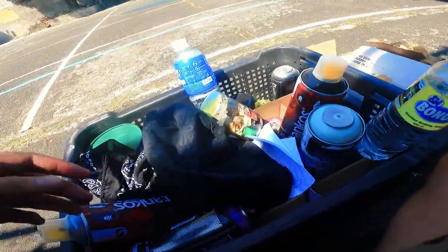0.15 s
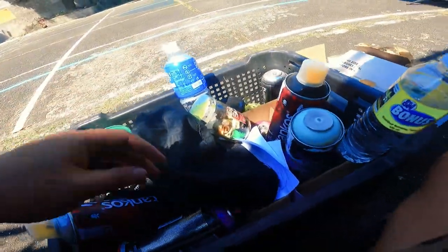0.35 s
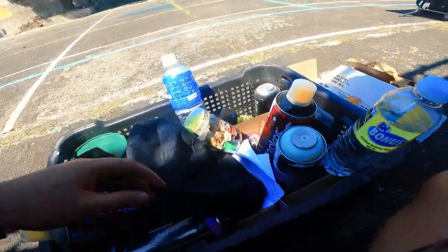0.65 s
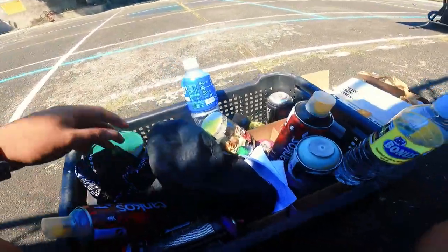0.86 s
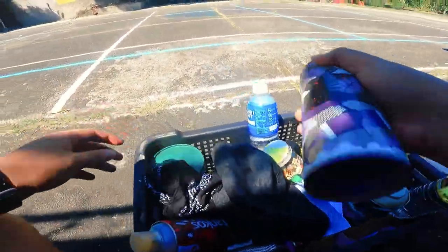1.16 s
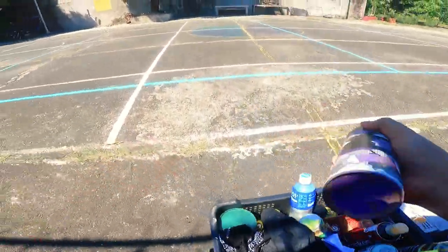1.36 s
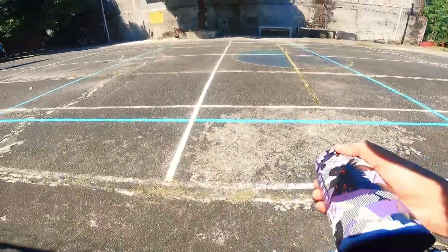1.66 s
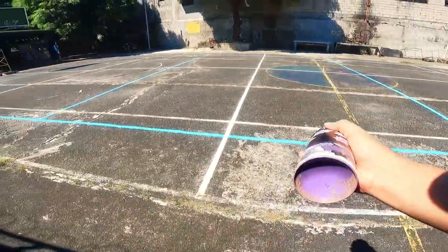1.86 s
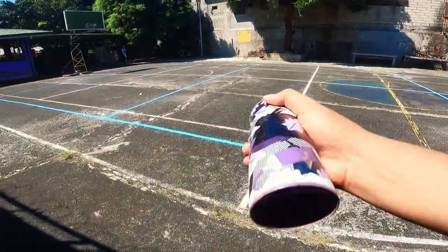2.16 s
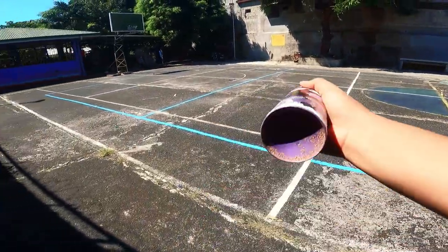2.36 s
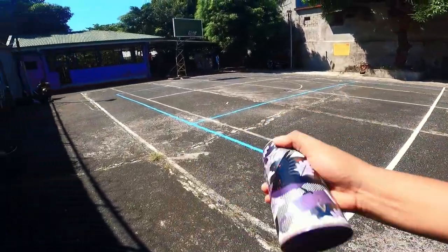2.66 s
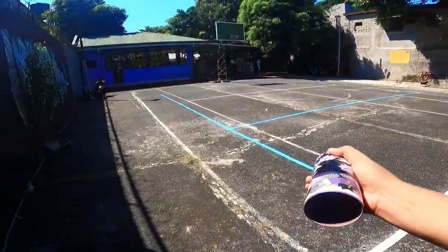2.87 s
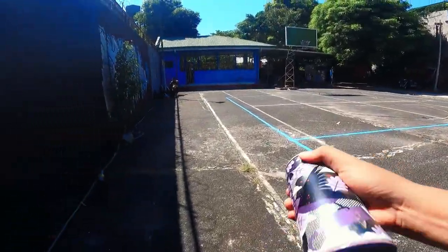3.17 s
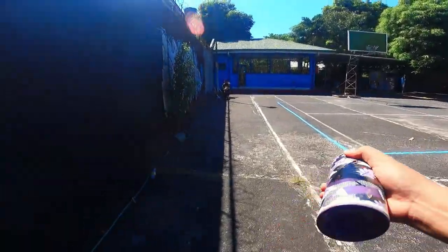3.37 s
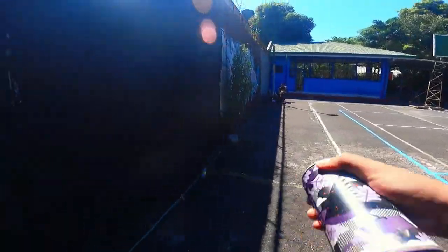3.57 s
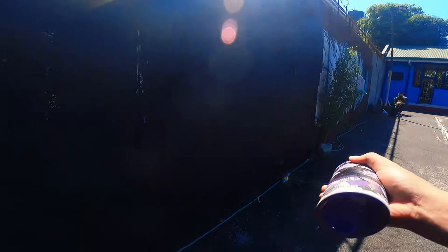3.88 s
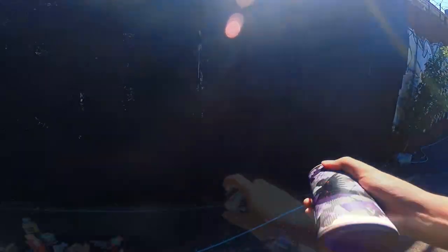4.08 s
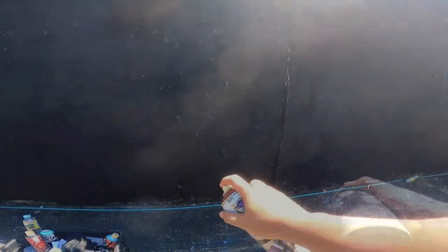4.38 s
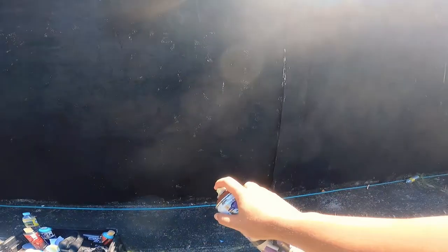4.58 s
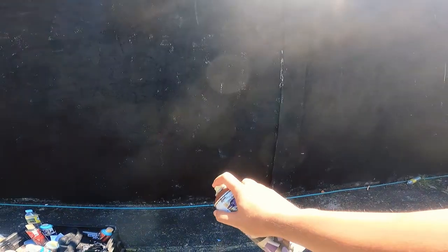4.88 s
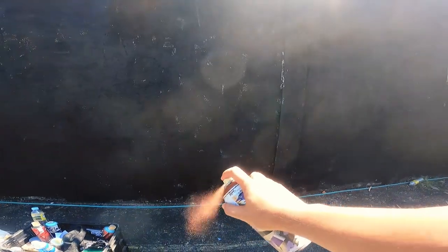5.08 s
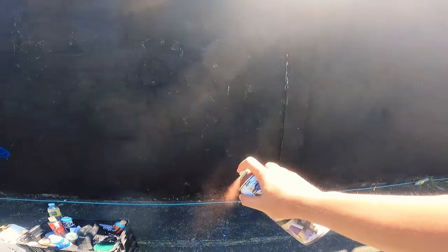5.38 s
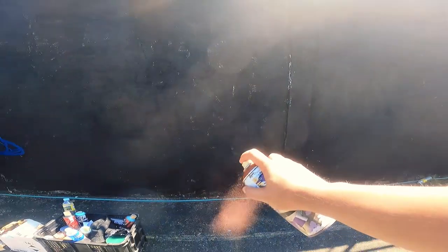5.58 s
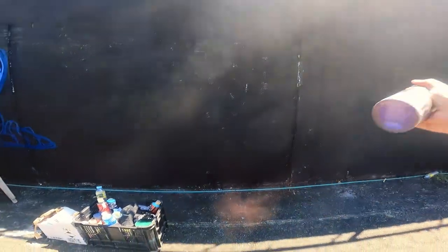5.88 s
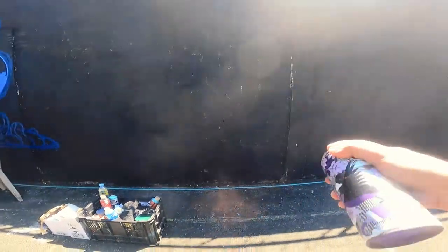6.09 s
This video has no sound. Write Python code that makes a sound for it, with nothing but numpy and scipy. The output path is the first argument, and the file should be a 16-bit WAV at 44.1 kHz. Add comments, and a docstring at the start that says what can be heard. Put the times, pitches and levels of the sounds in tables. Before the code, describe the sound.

Rapid metallic ball rattle inside a shaken paint can, dying away to quiet open air, short soft spray hisses, then the rattle restarts.

```python
"""A spray can is shaken hard on an open court: its mixing ball bangs and bounces on the paint-damped wall
and domed ends. Each contact rings decaying sines, with a faint smear and bands of noise around it.
The shaking stops, the nozzle gives three short puffs of hissing noise, the rattle starts again.
Wind rumbles on the microphone and far traffic hisses, both as coloured noise.
A low hum, a sine of unsteady pitch, wavers early on."""
import sys
import numpy as np
from scipy import signal
from scipy.fft import rfft, irfft, next_fast_len
from scipy.io import wavfile
from scipy.ndimage import uniform_filter1d, map_coordinates

SR = 44100
rng = np.random.default_rng(int(sys.argv[2]) if len(sys.argv) > 2 else 0)


def amp(db):
    return 10 ** (np.asarray(db, float) / 20)


def write(x):
    x = np.atleast_2d(x).T
    wavfile.write(sys.argv[1], SR, np.round(np.clip(x, -1, 1) * 32767).astype(np.int16))


N = 275184  # length in samples

# ball contacts: [t/s, strength/dB, landing spot from 0 mid-wall to 1 far end, pitch that rings out f/Hz]
CONTACTS = [(0.0068, -19.5, 0.38, 1620), (0.046, -28.5, 0.2, 1500), (0.07, -17.5, 0.45, 4040),
            (0.0735, -12.5, 0.8, 5070), (0.113, -25.5, 0.57, 4630), (0.1418, -27, 0.56, 4530),
            (0.172, -23.5, 0.58, 4600), (0.1873, -29.5, 0.4, 1680), (0.1965, -22, 0.4, 1870),
            (0.217, -29, 0.22, 1470), (0.244, -18, 0.42, 1090), (0.2514, -22.5, 0.31, 1210),
            (0.2838, -23, 0.16, 1250), (0.29, -22, 0.36, 1390), (0.3182, -11.5, 0.61, 4940),
            (0.337, -16, 0.57, 4630), (0.3508, -21.5, 0.31, 1300), (0.3678, -16, 0.71, 4780),
            (0.406, -27, 0.4, 1310), (0.421, -18, 0.36, 1310), (0.4661, -17, 0.32, 1380),
            (0.483, -21, 0.18, 1670), (0.5074, -27, 0.11, 1470), (0.547, -10.5, 0.57, 4540),
            (0.575, -25, 0.37, 1300), (0.596, -12.5, 0.5, 4080), (0.627, -14, 0.49, 4450),
            (0.6469, -25, 0.42, 1400), (0.675, -14, 0.46, 1270), (0.6915, -16.5, 0.38, 1250),
            (0.7723, -5.5, 0.55, 4190), (0.8197, -21, 0.5, 4460), (0.8558, -18, 0.62, 3050),
            (0.8683, -19, 0.45, 1620), (0.8775, -17.5, 0.46, 1450), (0.8932, -21, 0.41, 1390),
            (0.939, -15.5, 0.44, 804), (0.9888, -21, 0.44, 1500), (1.0117, -10, 0.62, 4080),
            (1.023, -11, 0.59, 3980), (1.046, -11.5, 0.66, 4380), (1.0865, -19, 0.41, 1156),
            (1.1045, -12, 0.36, 1660), (1.1291, -12, 0.3, 1680), (1.1434, -13, 0.5, 1000),
            (1.1812, -12, 0.39, 1070), (1.1922, -15, 0.12, 1740), (1.2411, -16.5, 0.4, 970),
            (1.2495, -11, 0.56, 4920), (1.2793, -8.5, 0.58, 4450), (1.343, -20, 0.31, 1790),
            (1.361, -17.5, 0.46, 1820), (1.3776, -13.5, 0.44, 1790), (1.4089, -19.5, 0.39, 1680),
            (1.4412, -9.5, 0.5, 1620), (1.4987, -21.5, 0.35, 990), (1.5331, -8.5, 0.6, 3030),
            (1.5518, -32, 0.28, 2730), (1.594, -15.5, 0.7, 2970), (1.6183, -16, 0.26, 1250),
            (1.6339, -11.5, 0.43, 1660), (1.652, -27, 0.64, 1190), (1.666, -13, 0.47, 1080),
            (1.684, -15.5, 0.38, 2950), (1.737, -25.5, 0.31, 3100), (1.7631, -11.5, 0.57, 2950),
            (1.7695, -14.5, 0.71, 2870), (1.816, -31, 0.4, 1300), (1.8235, -28.5, 0.76, 3400),
            (1.838, -23, 0.42, 2880), (1.8708, -13, 0.5, 1270), (1.892, -18.5, 0.39, 1600),
            (1.914, -11.5, 0.49, 1107), (1.9476, -12, 0.5, 6900), (1.9854, -23, 0.22, 1250),
            (2.0206, -9, 0.69, 2790), (2.031, -14.5, 0.73, 2940), (2.074, -32, 0.75, 3300),
            (2.09, -29, 0.47, 2500), (2.1135, -19.5, 0.46, 1630), (2.1265, -24, 0.43, 1610),
            (2.1357, -21, 0.38, 1640), (2.1738, -11.5, 0.48, 2510), (2.184, -15.5, 0.47, 2065),
            (2.1985, -22.5, 0.43, 1600), (2.254, -22.5, 0.35, 1570), (2.2668, -12.5, 0.61, 2920),
            (2.271, -11, 0.7, 4330), (2.2974, -17, 0.72, 2750), (2.3235, -19, 0.7, 2870),
            (2.348, -15.5, 0.75, 3520), (2.3674, -15.5, 0.47, 1730), (2.3905, -20, 0.34, 1670),
            (2.4358, -10.5, 0.41, 1680), (2.447, -16.5, 0.46, 1610), (2.4755, -29, 0.2, 1590),
            (2.528, -8, 0.78, 2700), (2.5352, -16, 0.73, 4440), (2.585, -29, 0.93, 2940),
            (2.6184, -17, 0.92, 3520), (2.6279, -17, 0.41, 1700), (2.6352, -33, 0.3, 1640),
            (2.6487, -19, 0.24, 1530), (2.6653, -32, 0.34, 1500), (2.6809, -13.5, 0.53, 1015),
            (2.6941, -15.5, 0.51, 1020), (2.774, -11.5, 0.47, 2940), (2.7884, -10, 0.64, 3000),
            (2.8064, -18, 0.57, 2780), (2.8481, -13, 0.68, 5600), (2.875, -15.5, 0.49, 1750),
            (2.8927, -21.5, 0.36, 1550), (2.9241, -13, 0.41, 2970), (2.9357, -20, 0.51, 1960),
            (2.9505, -14, 0.43, 1390), (3.0384, -19.5, 0.31, 940), (3.0474, -11, 0.63, 3080),
            (3.0651, -13, 0.66, 2970), (3.0776, -26, 0.3, 1230), (3.102, -16, 0.64, 3100),
            (3.1208, -21, 0.5, 1534), (3.1377, -12.5, 0.45, 1350), (3.1582, -26, 0.39, 1300),
            (3.175, -23, 0.46, 975), (3.189, -13, 0.45, 1000), (3.2013, -12.5, 0.32, 3190),
            (3.2627, -16, 0.5, 1140), (3.278, -7.5, 0.59, 4190), (3.3113, -23, 0.46, 1290),
            (3.3219, -21, 0.62, 2940), (3.3755, -12.5, 0.32, 1600), (3.3944, -19.5, 0.33, 1600),
            (3.4122, -15, 0.29, 1580), (3.448, -13.5, 0.53, 1565), (3.455, -17.5, 0.18, 1470),
            (3.4609, -12.5, 0.39, 2140), (3.4717, -19.5, 0.5, 1570), (3.4988, -22, 0.36, 1410),
            (3.5323, -9.5, 0.43, 2910), (3.5376, -9, 0.76, 4110), (3.5532, -13.5, 0.64, 3970),
            (3.591, -23.5, 0.5, 1570), (3.625, -15, 0.44, 1690), (3.6433, -17.5, 0.15, 1690),
            (3.653, -15, 0.25, 1660), (3.6719, -11.5, 0.35, 2920), (3.7023, -9, 0.37, 2470),
            (3.7382, -15.5, 0.55, 1400), (3.762, -21, 0.2, 3100), (3.7864, -10, 0.55, 3030),
            (3.7938, -13.5, 0.63, 4100), (3.8204, -17.5, 0.61, 3140), (3.859, -14.5, 0.63, 4430),
            (3.8854, -12, 0.54, 1760), (3.895, -16.5, 0.56, 1780), (3.9236, -17.5, 0.28, 1700),
            (3.9649, -7.5, 0.42, 2990), (4.0308, -22, 0.33, 3320), (4.0444, -20, 0.61, 3360),
            (4.052, -9.5, 0.69, 3240), (4.0667, -17.5, 0.55, 3430), (4.0867, -36, 0.6, 3220),
            (4.118, -33, 0.26, 3250), (4.1287, -34, 0.37, 3500), (4.151, -22, 0.45, 1540),
            (4.1698, -24.5, 0.47, 1650), (4.197, -20, 0.54, 1017), (4.209, -21.5, 0.45, 2840),
            (4.2695, -38.5, 0.41, 1200), (4.3127, -23.5, 0.62, 4770), (4.3196, -23.5, 0.53, 3280),
            (4.331, -32, 0.99, 2890), (4.3703, -36, 0.4, 1510), (4.3807, -39, 0.25, 1600),
            (4.39, -38.5, 0.67, 3630), (4.4045, -37, 0.22, 1570), (4.416, -41, 0.25, 1600),
            (4.451, -36.5, 0.42, 1020), (5.1416, -34, 0.34, 1520), (5.275, -27, 0.78, 6300),
            (6.0753, -28.5, 0.14, 920), (6.124, -12, 0.47, 3960), (6.133, -12, 0.67, 2850),
            (6.153, -16.5, 0.44, 4100), (6.1608, -20, 0.62, 4240), (6.1832, -23, 0.39, 980),
            (6.2264, -11.5, 0.59, 4800), (6.228, -9.5, 0.49, 2750)]
# what the can rings with, before each contact varies it: [f/Hz, level/dB, time to fall by 60 dB t/s]
CAN_MODES = [(330, -10.5, 0.0075), (1036, 4.5, 0.0035), (1644, 0.5, 0.0065), (2540, 3.5, 0.0064),
             (3094, 6, 0.0052), (4010, 5, 0.0029), (5160, -1.5, 0.0061), (6226, -3.5, 0.0049),
             (8000, -6.5, 0.002), (13000, -28, 0.0034), (14800, -44, 0.002)]
# borders between wall, dome, tick and crack modes: [f/Hz]
PART_BORDERS = [2000, 3500, 10000]
# how the grip lets the dome ring against the bright tick: [t/s, dome over tick level/dB]
GRIP_BALANCE = [(0, -7.5), (.6, -1), (1.35, -3), (1.6, -0.5), (2.3, 2.5), (2.6, -3), (4.1, 0.5), (5, -18),
                (6.2, -3)]
# how openly the can's crack reaches the microphone: [t/s, level/dB]
CRACK_OPENNESS = [(0, -6), (1.6, 7), (4.1, 0), (6.1, 9)]
# thick unmixed paint drags the ball at first, trading ring for rustle: [t/s, level/dB]
PAINT_WASH = [(1.3, 2.5), (1.45, -0.5)]
# the ball rolls along the wall: [start t/s, end t/s, level/dB]
BALL_ROLLS = [(6.095, 6.26, -21.5)]
# nozzle puffs: [valve starts to open t/s, starts to close t/s, level/dB]
NOZZLE_PUFFS = [(5.055, 5.232, -43), (5.497, 5.657, -45.5), (5.775, 6, -56)]
# colour of the nozzle hiss: [f/Hz, relative level per Hz/dB]
HISS_COLOUR = [(900, -22), (2000, -16), (7800, -20.5), (10900, -22.5), (12600, -19), (15700, -31)]
# wind rumble: [t/s, level/dB]
WIND_LEVEL = [(0.0, -21.5), (0.12, -24.5), (0.2, -34.5), (0.42, -39.5), (1.68, -36.5), (1.88, -47),
              (4.03, -42.5), (4.33, -58), (4.74, -36.5), (6.24, -40.5)]
# colour of the wind rumble: [f/Hz, relative level per Hz/dB]
WIND_COLOUR = [(15, -39), (25, 6.5), (50, 2), (141, -0.5), (257, -9.5), (500, -30), (1100, -120)]
# far traffic: [t/s, level/dB]
TRAFFIC_LEVEL = [(0, -47.5), (4.1, -51.5), (4.4, -53.5), (4.75, -42), (5.3, -44.5), (6.2, -47.5)]
# colour of the far traffic: [f/Hz, relative level per Hz/dB]
TRAFFIC_COLOUR = [(150, -6), (535, -10.5), (975, -16.5), (1260, -21), (3000, -22), (5250, -30.5),
                  (12000, -42), (15600, -86), (22000, -120)]
# low hum, before it wavers: [t/s, f/Hz, level/dB]
HUM_TRACK = [(.2, 130.6, -43), (.85, 148.7, -44), (1.6, 148.6, -51.5), (2.6, 152.7, -57.5)]
# the sound starts on the right and folds to the centre: [t/s, left minus right level/dB]
SIDE_LEAN = [(0, -5.5), (.3, -5), (.45, -.8), (.8, 0)]
# colour of the left-right difference: [f/Hz, relative level per Hz/dB]
SIDE_COLOUR = [(3500, -30), (4500, -19.5), (10500, -24.5), (15500, -43)]
# microphone colour: [f/Hz, level/dB]
MIC_COLOUR = [(8300, 0), (10900, -11), (12500, -9)]

SPOT_DB, SCATTER_DB = 50, 2  # ends over wall gained from spot 0 to 1; chance in the dome-tick balance
WALL_DB, DOME_DB, TICK_DB = 3, 2, 6  # each part's ring over its share of the strength
FAVOUR_DB, OTHERS_DB = 4.5, -2.5  # gain of the mode nearest a contact's pitch, and of the rest
LINGER = 1.366  # times longer that the nearest mode rings, on wall and dome
SOFT_DB_PER_DB = 0.3  # how fast the other modes drop out as contacts get lighter


def unit(x):
    """Scales a sound to an average (rms) level of 1."""
    return x / np.sqrt(np.mean(x ** 2) + 1e-20)


def curves(rows):
    """Draws straight lines between the rows: one value per sample for each column after the time."""
    s, *cols = np.transpose(rows)
    return [np.interp(np.arange(N) / SR, s, c) for c in cols]


def wobble(rate):
    """A smooth random curve through rate random points a second."""
    knots = rng.standard_normal(int(N * rate / SR) + 4)
    return map_coordinates(knots, [np.arange(N) * rate / SR])


def noise(spectrum):
    """Noise of rms 1, coloured by joining (Hz, dB) points on a logarithmic pitch scale."""
    m = next_fast_len(N)
    f, db = np.transpose(spectrum)
    gain = amp(np.interp(np.log(np.fft.rfftfreq(m, 1 / SR) + 1), np.log(f + 1), db))
    return unit(irfft(rfft(rng.standard_normal(m)) * gain, m)[:N])


def wind():
    """Wind on the microphone: low noise whose level rises and falls in gusts."""
    level_db, = curves(WIND_LEVEL)
    return amp(level_db) * unit(amp(2.1 * wobble(6)) * noise(WIND_COLOUR))


def traffic():
    """Far traffic: noise that grows weaker towards the treble, at a drifting level."""
    level_db, = curves(TRAFFIC_LEVEL)
    return amp(level_db + 1.75 * wobble(7)) * noise(TRAFFIC_COLOUR)


def hum():
    """A low sine whose pitch and level both waver."""
    hz, level_db = curves(HUM_TRACK)
    turns = np.cumsum(hz + 2.17 * wobble(12)) / SR
    return amp(level_db + 2.8 * wobble(8.2)) * np.sqrt(2) * np.sin(2 * np.pi * turns)


def share_db(over_db):
    """Share of the energy, in dB, taken by a part that lies over_db above its rival."""
    return -10 * np.log10(1 + amp(-over_db) ** 2)


def contacts():
    """Splits each contact among wall, dome and tick by where the ball lands and how the can is held."""
    s, strength_db, spot, hz = np.transpose(CONTACTS)
    ends_db = SPOT_DB * (spot - .5)
    dome_over_tick_db = np.interp(s, *np.transpose(GRIP_BALANCE)) + SCATTER_DB * rng.standard_normal(len(s))
    ends = strength_db + share_db(ends_db)
    wall = strength_db + share_db(-ends_db) + WALL_DB
    dome = ends + share_db(dome_over_tick_db) + DOME_DB
    tick = ends + share_db(-dome_over_tick_db) + TICK_DB
    return np.column_stack([s, wall, dome, tick, hz])


def wash_db(blows):
    """How much the paint smears each contact, in dB."""
    return np.interp(blows[:, 0], *np.transpose(PAINT_WASH))


def parts(blows):
    """Levels of wall, dome, tick and crack; the crack follows wall and tick and grows faster with force."""
    force_db = np.maximum(blows[:, 1], blows[:, 3] - 4)
    open_db = np.interp(blows[:, 0], *np.transpose(CRACK_OPENNESS))
    crack_db = force_db + 0.48 * (force_db + 15) + open_db
    return np.column_stack([blows[:, 1:-1], crack_db])


def ring(blows, lead_db):
    """Each blow rings the can's modes inside a faint smear; chance varies pitch and strength every time."""
    hz, db, t60 = np.transpose(CAN_MODES)
    part = np.searchsorted(PART_BORDERS, hz)  # 0 wall, 1 dome, 2 tick, 3 crack
    lead = SR // 30
    t = np.arange(-lead, lead) / SR
    draw = rng.standard_normal((len(blows), 5, len(CAN_MODES)))
    level_draw, pitch_draw, phase, beat_draw, smear_draw = np.moveaxis(draw, 1, 0)
    level_db = parts(blows)[:, part] + db - wash_db(blows)[:, None] / 2
    pitch = hz * (1 + (.02 + .05 * (part >= 2)) * pitch_draw)
    soft_db = SOFT_DB_PER_DB * np.clip(-14 - blows[:, 1:-1].max(1, keepdims=True), 0, None)

    # the mode nearest a contact's own pitch takes that pitch and is favoured
    apart = np.abs(np.log(hz / blows[:, -1:]))
    near = apart == apart.min(1, keepdims=True)
    pitch = np.where(near, blows[:, -1:], pitch)
    level_db = level_db + np.where(near, FAVOUR_DB, OTHERS_DB - soft_db)

    # chance shifts energy between the modes but keeps the total
    mixed_db = level_db + np.where(near, 0, 2.7 * level_draw)
    energy = (amp(level_db) ** 2).sum(1)
    mixed_energy = (amp(mixed_db) ** 2).sum(1)
    level_db = mixed_db + 10 * np.log10(energy / mixed_energy)[:, None]

    # level of the smear around the blow, against the struck ring
    uneven_db = np.where(near, 3 - 4 * (part != 1), 6.0 * np.clip(smear_draw, -3, 1) - 2.5)
    smear_db = lead_db - 2 * soft_db - 4.1 * (part % 3 == 0) + uneven_db
    tail = np.where(near, .05, .018)  # seconds for the smear to fall by 60 dB after the blow
    decay = t60 * np.where(near & (part < 2), LINGER, 1)
    beat_hz = 60 * (1 + (part == 2)) * beat_draw * np.where(near, .5, 1)

    after = np.clip(t, 0, None)
    contact = 1 - np.exp(-(after / 0.00036) ** 2)  # the paint film cushions the ball
    edge = np.sqrt(np.hanning(len(t)))
    out = np.zeros(N + SR)
    for i, s in enumerate(blows[:, 0]):
        struck = amp(-60 * after / decay[i][:, None]) * contact
        # a faint, uneven smear at the modes' pitches rises before the blow and fades after it
        beat = np.cos(2 * np.pi * beat_hz[i][:, None] * t)
        slope = np.where(t < 0, -t / 0.13, t / tail[i][:, None])
        smear = amp(smear_db[i][:, None] - 60 * slope) * beat * edge
        tone = np.sin(2 * np.pi * (pitch[i][:, None] * t + phase[i][:, None]))
        modes = amp(level_db[i][:, None]) * (struck + smear) * tone
        out[max(round(s * SR), 0):][:len(t)] += modes.sum(0)
    return out[lead:N + lead]


def bounces(blows, count):
    """The ball chatters raggedly around each blow, the more the harder it lands."""
    draw = rng.random((len(blows), count, 4))
    s = blows[:, :1] + 0.016 * (draw[..., 0] - .3)
    hard_db = 0.12 * (blows[:, None, 1:-1].max(2, keepdims=True) + 12)
    db = blows[:, None, 1:-1] + hard_db - 9 - 9 * draw[..., 1:]
    return np.column_stack([s.ravel(), db.reshape(-1, 3), np.repeat(blows[:, -1], count)])


def scrape(blows, part, level_db, smear, fade):
    """Noise coloured by one part's modes: a short smear before each blow, a rustle fading after it.

    smear and fade are the seconds for a 60 dB change; all parts but the crack also sound in a roll."""
    push_db = parts(blows)[:, part] + wash_db(blows) * (0 < part < 3)
    push = np.bincount(np.round(blows[:, 0] * SR).astype(int), amp(push_db) ** 2, N)[:N]
    t = np.arange(-SR // 5, SR // 5 + 1) / SR
    shape = amp(-60 * np.where(t < 0, -t / smear, t / fade)) ** 2
    shape = shape + amp(-32.5 - 60 * np.abs(t) / 1.3) ** 2 * (part < 3)  # a faint, slower skirt
    now = np.arange(N) / SR
    roll = sum(amp(db) * np.sin(np.pi * np.clip((now - on) / (off - on), 0, 1)) for on, off, db in BALL_ROLLS)
    roll_power = (roll * amp(-5 * (part < 2))) ** 2 * (part < 3)
    level = np.sqrt(np.abs(signal.fftconvolve(push, shape, "same")) + roll_power)

    # a mode's width in Hz follows from its decay time
    f = np.fft.rfftfreq(N, 1 / SR)
    body = sum(amp(db) ** 2 / (1 + ((f - hz) * t60 / 4) ** 2) ** 2
               for hz, db, t60 in CAN_MODES if np.searchsorted(PART_BORDERS, hz) == part)
    rough = amp(level_db + 4.47 * wobble(250))
    return rough * level * unit(irfft(rfft(rng.standard_normal(N)) * np.sqrt(body), N))


def can():
    """The shaken can: ringing blows, their chatter, and the rustle of wall, dome, tick and crack."""
    blows = contacts()
    hits = ring(blows, lead_db=-23.5) + ring(bounces(blows, count=3), lead_db=-31)
    wall = scrape(blows, part=0, level_db=-13.5, smear=0.0047, fade=0.048)
    dome = scrape(blows, part=1, level_db=-12.5, smear=0.031, fade=0.04)
    tick = scrape(blows, part=2, level_db=-17.5, smear=0.0069, fade=0.061)
    crack = scrape(blows, part=3, level_db=-26.5, smear=0.0034, fade=0.005)
    return hits + wall + dome + tick + crack


def nozzle():
    """Puffs of unsteady hiss: the valve opens fast and closes slower."""
    t = np.arange(N) / SR
    flow = np.zeros(N)
    for on, off, db in NOZZLE_PUFFS:
        opening = np.clip((t - on) / 0.019, 0, 1)
        closing = np.exp(-np.clip(t - off, 0, None) / 0.05)
        flow += amp(db) * opening * closing
    return flow * amp(0.23 * wobble(27)) * noise(HISS_COLOUR)


def scene():
    """Mixes all sources, leaning right at first; a faint treble rustle differs between the sides."""
    lean_db, = curves(SIDE_LEAN)
    mid = wind() + traffic() + hum() + can() + nozzle()
    # the rustle follows the loudness of the treble, averaged over 600 samples
    loudness = np.sqrt(np.abs(uniform_filter1d(np.diff(mid, prepend=0) ** 2, size=600)))
    side = amp(-25.0) * loudness * noise(SIDE_COLOUR)
    return np.array([mid + side, mid - side]) * amp(np.array([lean_db / 2, -lean_db / 2]))


def band_limit(x):
    """A steep low-pass at the top of the band."""
    return signal.sosfilt(signal.butter(12, 15870, fs=SR, output="sos"), x)


def record(dry):
    """Rounds off the highest peaks, dips near 11 kHz, and sets the top treble wide and to the right."""
    hz = np.fft.rfftfreq(N, 1 / SR)
    soft = dry / (1 + (dry / .9) ** 4) ** .25
    colour = amp(np.interp(hz, *np.transpose(MIC_COLOUR)))
    # above the corner the left channel is weaker and lags by 0.25 ms
    top = hz > 11200
    gain = amp(np.outer([-4.5, 3.5], top))
    lag = np.exp(-2j * np.pi * np.outer([.00025, 0], hz * top))
    kept = hz < 15850  # cuts everything above this pitch
    mix = irfft(rfft(soft) * colour * gain * lag * kept, N)
    return band_limit(mix)


dry = scene()
out = record(dry)
write(out)
```